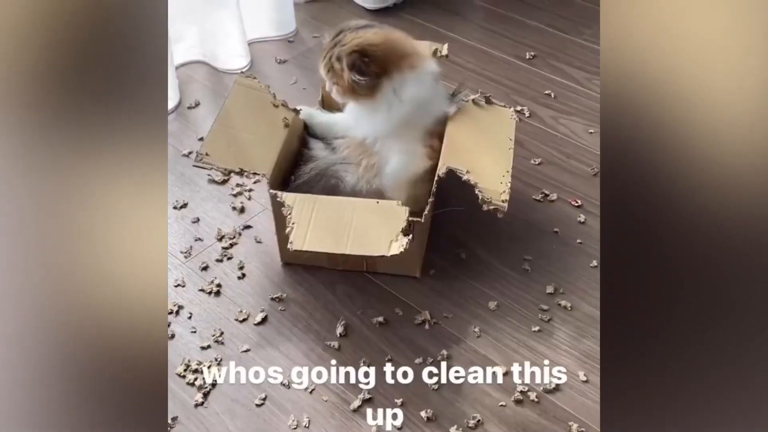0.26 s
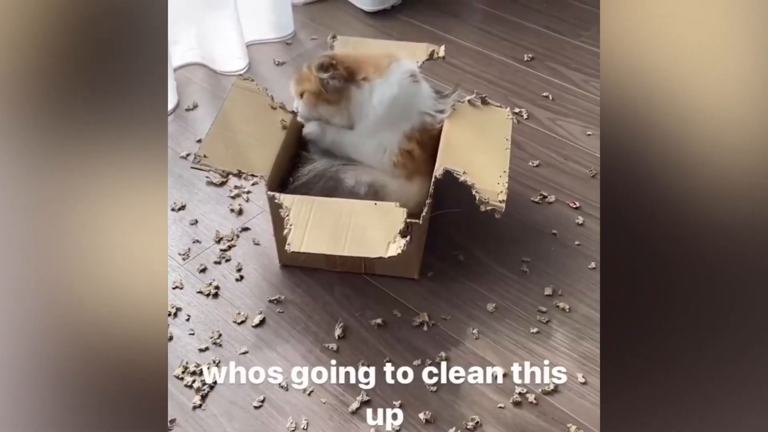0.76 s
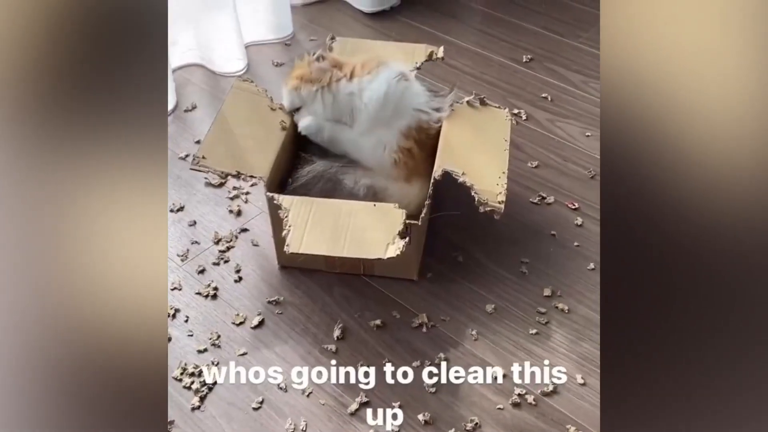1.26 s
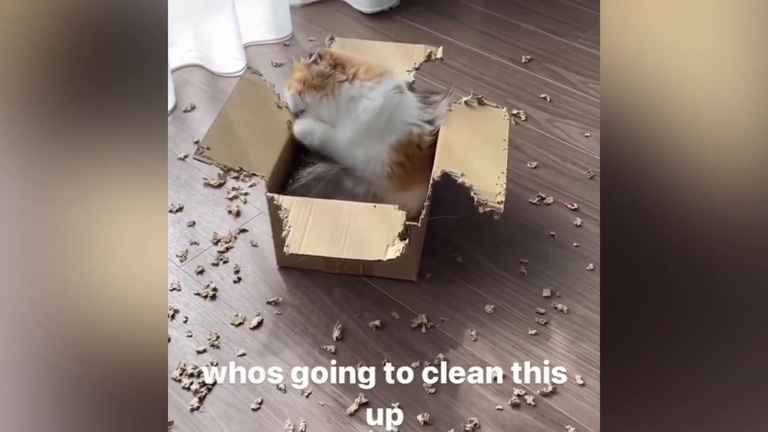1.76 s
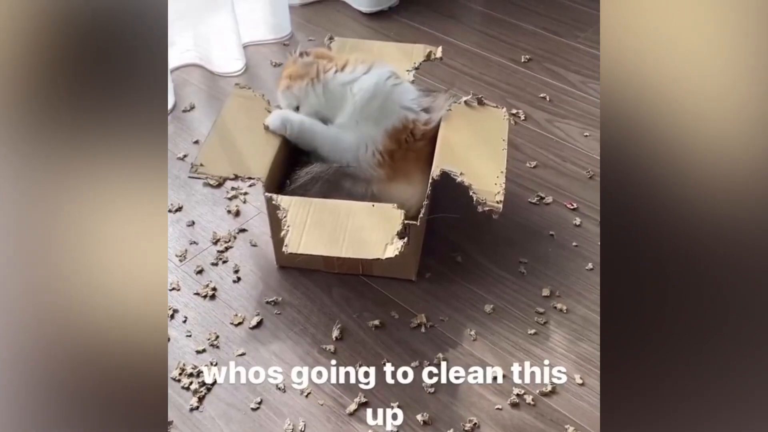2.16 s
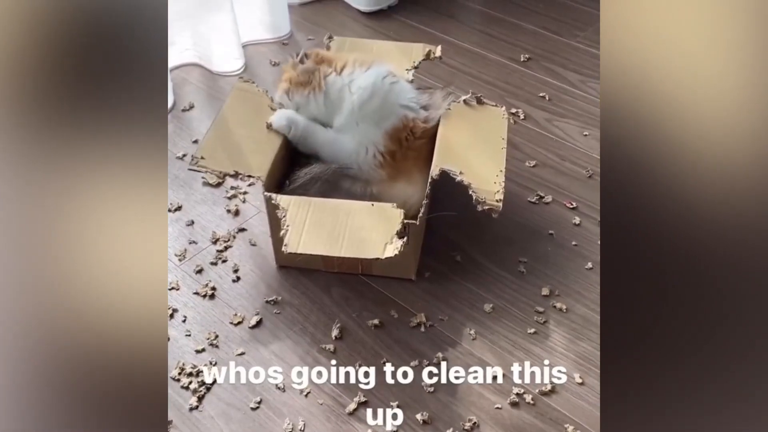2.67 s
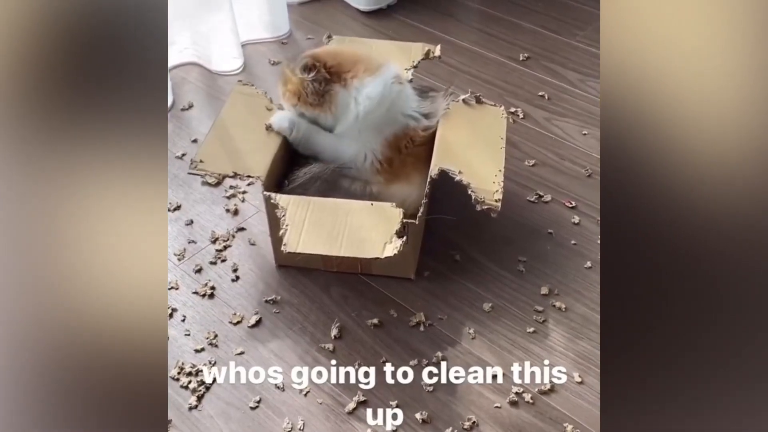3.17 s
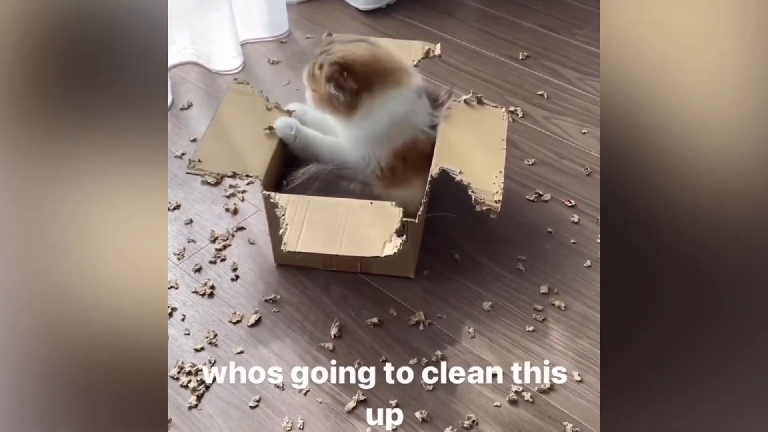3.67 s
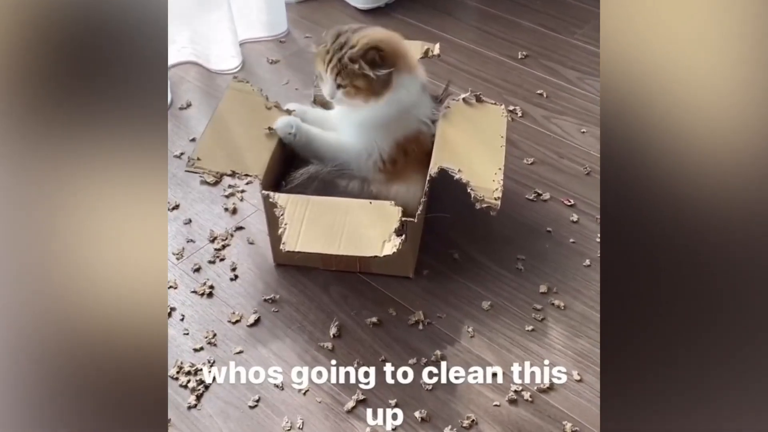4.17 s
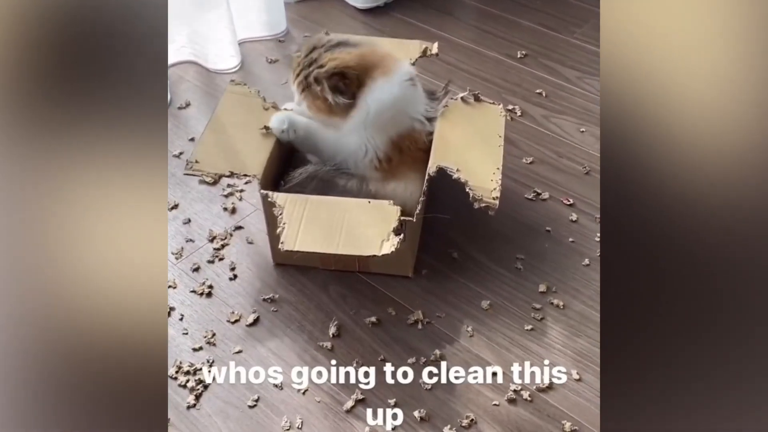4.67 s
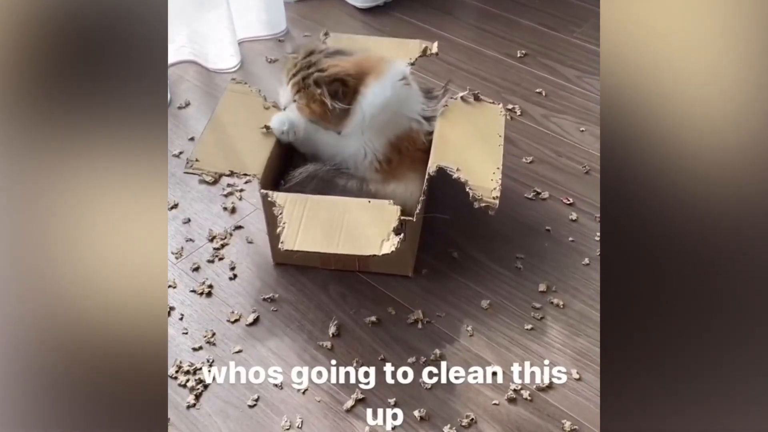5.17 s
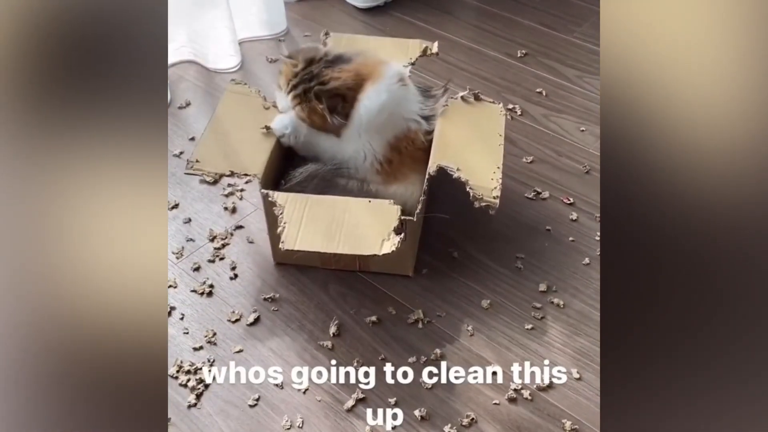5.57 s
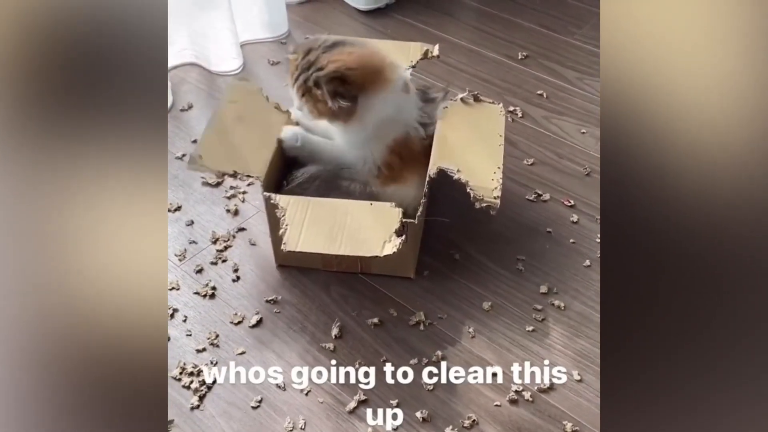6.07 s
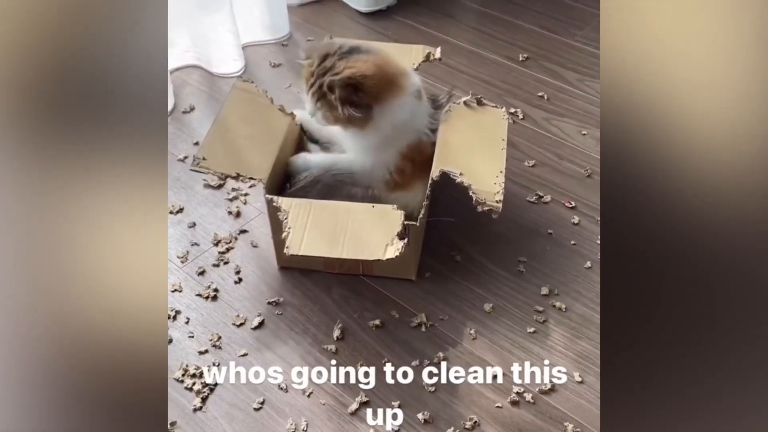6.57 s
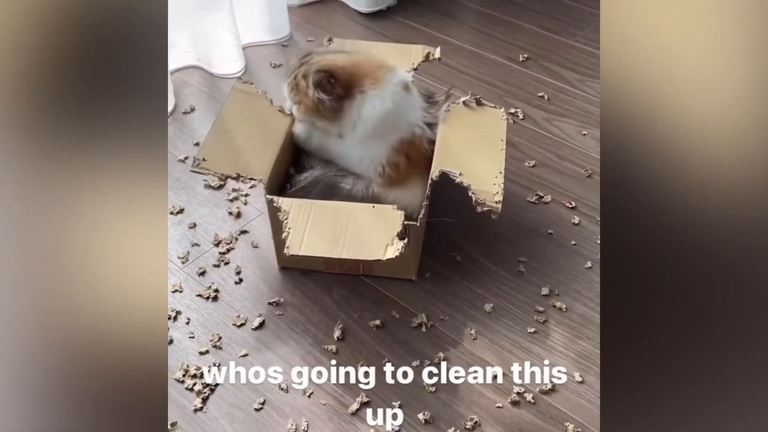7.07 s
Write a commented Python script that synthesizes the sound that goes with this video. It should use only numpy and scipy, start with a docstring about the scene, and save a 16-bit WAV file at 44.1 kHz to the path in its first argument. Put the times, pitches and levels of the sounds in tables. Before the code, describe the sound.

A cat bites and paws at a cardboard box on a wooden floor. Faint rubbing starts after a second, then hollow knocks and dry scrapes gather into a busy cluster before three seconds. A strong ripping thump follows, then sparse light scratches and near quiet, until the loudest tear and boxy thump around six seconds. Close stereo microphones in a small room, box slightly left, with short echoes and faint low hum.

```python
"""Scraping, squeaks, knocks and thumps: a cat in a cardboard box bites and tugs at a flap; paws and fur rub
the walls and the box knocks on a wooden floor. Clicks ring the card, filtered noise makes hiss and squeaks,
and sagging sines make thumps. The small room adds echoes and hums: dull airy noise, a low rumble that
swells, and two thin appliance tones. Two spaced microphones hear it."""
import sys
import numpy as np
from scipy import signal
from scipy.fft import rfft, irfft, next_fast_len
from scipy.io import wavfile

SR = 44100
rng = np.random.default_rng(int(sys.argv[2]) if len(sys.argv) > 2 else 0)


def log_audio(samples):
    """Write samples as a 16-bit WAV file to the path given in sys.argv[1]."""
    # one column per channel
    frames = np.atleast_2d(samples).T
    # limit to full scale, then quantise
    limited = np.clip(frames, -1, 1)
    pcm = np.round(limited * 32767).astype(np.int16)
    wavfile.write(sys.argv[1], SR, pcm)


N = 322812   # length in samples


def from_db(db):
    """Turn a level in dB into a gain."""
    return 10 ** (np.asarray(db) / 20)


def rms_one(x):
    """Scale a sound to rms 1."""
    return x / np.sqrt(np.mean(x ** 2) + 1e-20)


def in_time(rows):
    """Draw straight lines through (time, value) points, one value a sample."""
    s, values = np.transpose(rows)
    return np.interp(np.arange(N) / SR, s, values)


def at_hz(points, hz):
    """Read a (frequency, value) table along a log frequency axis."""
    table_hz, values = np.transpose(points)
    return np.interp(np.log(hz + 1), np.log(table_hz), values)


def coloured(x, spectrum):
    """Filter a sound by a (frequency, level) table."""
    size = next_fast_len(N)
    gain = from_db(at_hz(spectrum, np.fft.rfftfreq(size, 1 / SR)))
    return irfft(rfft(x, size) * gain, size)[..., :N]


def slow_noise(shape, cutoff_hz, fs=SR):
    """Random wandering: white noise with only its slow part kept."""
    lowpass = signal.butter(2, cutoff_hz, fs=fs, output="sos")
    return signal.sosfilt(lowpass, rng.standard_normal(shape))


def ring(clicks, hz, t60):
    """A resonator: a unit click starts a sine that falls 60 dB in t60 seconds."""
    r = from_db(-60 / (max(t60, 1e-3) * SR))
    w = 2 * np.pi * hz / SR
    return signal.lfilter([0, np.sin(w)], [1, -2 * r * np.cos(w), r * r], clicks + 1e-18)


def grains(per_s, spread_db):
    """Random clicks of uneven size and either sign, rms 1."""
    sizes = from_db(spread_db * np.minimum(rng.exponential(1, N), 4)) * rng.choice([-1, 1], N)
    return rms_one(sizes * (rng.random(N) < per_s / SR))


def hum():
    """Airy noise, a low resonance driven by noise, and sine tones that waver a little."""
    # room noise common to both sides, relative spectrum: [f/Hz, level/dB]
    mid_spectrum = [(12, -71), (20, -41.5), (49, -4), (68, 0.5), (112, -6), (148, -2.5), (219, -14),
                    (306, -2), (465, -16.5), (506, -13.5), (687, -21), (789, -20), (1200, -40.5),
                    (8650, -58), (11500, -59), (12500, -70), (15500, -73)]
    # its left-right difference, relative spectrum: [f/Hz, level/dB]
    side_spectrum = [(25, -21), (59, -25.5), (100, -21), (403, -8), (497, -7.5), (530, -7), (727, -19.5),
                     (792, -16), (843, -15.5), (1230, -25), (1620, -32.5), (11500, -52.5), (12500, -70),
                     (15500, -57)]
    # swelling of the low rumble: [t/s, level/dB]
    rumble_level = [(0, -60.5), (1.3, -67.5), (2.5, -61), (2.95, -65.5), (3.97, -52), (4.4, -62),
                    (5.1, -61.5), (6.24, -61), (7.32, -66.5)]
    # appliance tones, levels before the waver: [f/Hz, left level/dB, right level/dB, left leads/rad]
    tones = [(500, -65.5, -78, 2.46), (773, -65.5, -68.5, 2.15)]
    waver_db, wavers_hz = 2.5, 6
    mid = from_db(-55) * rms_one(coloured(rng.standard_normal(N), mid_spectrum))
    side = from_db(-65.5) * rms_one(coloured(rng.standard_normal(N), side_spectrum))
    rumble = rms_one(ring(rng.standard_normal(N), hz=57.2, t60=0.4))
    out = mid + from_db(in_time(rumble_level)) * rumble + side * [[1], [-1]]
    for hz, left_db, right_db, lead in tones:
        turn = 2 * np.pi * hz * np.arange(N) / SR
        waver = from_db(waver_db * rms_one(slow_noise(N, wavers_hz)))
        sides = from_db([[left_db], [right_db]])
        out += np.sqrt(2) * waver * sides * np.sin(turn + [[lead], [0]])
    return out


def stroke(s, hold, level_db, rise, fall):
    """Power of events that rise, hold and fall at set dB per second; where they overlap, powers add."""
    power, t = np.zeros(N), np.arange(N) / SR
    for at, held, db in np.broadcast(s, hold, level_db):
        # work only where the event is within 60 dB of full
        near = slice(max(int((at - 60 / rise) * SR), 0), int((at + held + 60 / fall) * SR))
        before = rise * (at - t[near])
        after = fall * (t[near] - at - held)
        power[near] += from_db(db - np.maximum(0, np.maximum(before, after))) ** 2
    return power


def rubbing():
    """Each catch of a claw or tooth rings one small patch of card for a few cycles; fibres and fur hiss."""
    # paws, teeth and fur drag over the card; t is when a stroke is full, sizzle is relative to hiss:
    # [t/s, held/s, scrape level/dB, hiss level/dB, finest sizzle level/dB]
    strokes = [(1.07, 0.072, -82, -82, -8), (1.2, 0.11, -72.5, -89, -7), (1.33, 0.044, -69.5, -88, -4),
               (1.57, 0.041, -73, -69, -5.5), (1.93, 0.13, -71.5, -74, -5.5), (2.05, 0.11, -73, -79, -4),
               (2.2, 0.14, -73.5, -75, -6.5), (2.43, 0.013, -65.5, -87, -7), (2.585, 0.007, -65, -71.5, -4),
               (2.653, 0.057, -62.5, -67, -4.5), (2.74, 0.041, -82, -69.5, 2.5),
               (2.82, 0.019, -75, -60.5, -5.5), (2.88, 0.016, -64, -64.5, -4), (3.061, 0.055, -79, -81, -8),
               (3.44, 0.053, -55.5, -63, -6.5), (3.62, 0.035, -75, -67.5, -7.5),
               (3.722, 0.011, -62.5, -67, -4.5), (3.918, 0.0059, -59.5, -74.5, -7),
               (4.02, 0.025, -65, -87, -1), (4.4, 0.064, -73, -105, -10), (4.61, 0.027, -73, -105, -12),
               (5.04, 0.01, -71, -102, -10), (5.455, 0.035, -63.5, -77, -7.5), (5.65, 0.024, -71, -82, -13),
               (5.82, 0.1, -67, -86, -11), (6.03, 0.12, -71, -81.5, -4), (6.18, 0.012, -46.5, -63.5, -6),
               (6.225, 0.043, -58.5, -66, -8), (6.295, 0.018, -75, -69, -11), (6.435, 0.024, -85, -94, -8)]
    # the card rips all at once: [t/s, scrape level/dB, hiss level/dB]
    rips = [(1.62, -50.5, -83), (2.716, -50, -48), (2.839, -68, -64), (3.425, -33, -42.5),
            (6.174, -34, -47)]
    # fur brushes the walls throughout: [t/s, level/dB]
    shifting = [(0.7, -88), (1.2, -82.5), (2.9, -72.5), (3.3, -82.5), (3.6, -73.5), (4.2, -80),
                (5.3, -81.5), (6.3, -72.5), (6.8, -81), (7.3, -83.5)]
    # relative spectrum of the scrape: [f/Hz, level/dB]
    scrape_spectrum = [(500, -3), (850, -4.5), (1150, -5.5), (1600, -6), (2200, -7), (3000, -17.5),
                       (4500, -19), (7000, -14.5), (12000, -59)]
    # relative spectrum of the hiss: [f/Hz, level/dB]
    hiss_spectrum = [(1800, 2), (3000, -0.5), (6000, -3), (8500, -3.5), (12000, -69)]
    stroke_rise, scrape_fall, hiss_fall = 442, 171, 242   # dB per s; the hiss stops sooner than the scrape
    rip_rise, rip_fall = 2500, 1800   # dB per s
    rip_sizzle_db = -7.5   # against the hiss of the rip
    patchy_db, patches_per_s = 4.5, 12.6   # each patch is caught now more, now less
    clumps_db, clumps_per_s = 1, 83   # strokes come in clumps
    snaps_db = -0.5   # single fibres snapping, against the catches
    step = 64   # samples for which a patch keeps its favour

    catches = grains(per_s=2000., spread_db=1.5)
    patches_hz = np.geomspace(700, 6500, 28)
    dealt = rng.integers(0, 28, N)   # the patch that each sample's catch would hit
    favour = rms_one(slow_noise((28, N // step + 1), patches_per_s, fs=SR / step))
    catches = catches * from_db(patchy_db * favour[dealt, np.arange(N) // step])
    rings = sum(ring(catches * (dealt == k), hz, 16 / hz) for k, hz in enumerate(patches_hz))

    snaps = grains(per_s=300., spread_db=3.0)
    # each snap rings four patches at once, more briefly
    snapping = sum(ring(snaps * (dealt % 7 == k % 7), hz, 6 / hz) for k, hz in enumerate(patches_hz))
    rings = rms_one(rings) + from_db(snaps_db) * rms_one(snapping)

    fibres = grains(per_s=12000., spread_db=1.8)
    sizzle = signal.sosfilt(signal.butter(4, 9300, "high", fs=SR, output="sos"), fibres)

    s, hold, scrape_db, hiss_db, fine_db = np.transpose(strokes)
    rip_s, rip_scrape_db, rip_hiss_db = np.transpose(rips)
    clumps = from_db(clumps_db * rms_one(slow_noise(N, clumps_per_s)))

    def effort(stroke_db, rip_db, fall=hiss_fall):
        """Power of strokes and rips together."""
        stroke_power = stroke(s, hold, stroke_db, stroke_rise, fall) * clumps ** 2
        return stroke_power + stroke(rip_s, 0, rip_db, rip_rise, rip_fall)

    scrape_power = effort(scrape_db, rip_scrape_db, scrape_fall) + from_db(in_time(shifting)) ** 2
    hiss_power = effort(hiss_db, rip_hiss_db)
    sizzle_power = effort(hiss_db + fine_db, rip_hiss_db + rip_sizzle_db)
    return (np.sqrt(scrape_power) * rms_one(coloured(rings, scrape_spectrum))
            + np.sqrt(hiss_power) * rms_one(coloured(fibres, hiss_spectrum))
            + np.sqrt(sizzle_power) * rms_one(sizzle))


def squeaks():
    """A claw or tooth sticks and slips on the card: a gliding band of friction noise in a rounded stroke."""
    # squeaks (narrow) and rasps (wide), level before the rounding, pitch at the start:
    # [t/s, length/s, level/dB, f/Hz, width/Hz]
    squeak_rows = [(0.911, 0.063, -81, 1960, 350), (1.066, 0.027, -84, 5600, 500),
                   (1.295, 0.058, -77, 2265, 1200), (1.363, 0.034, -75, 3720, 1500),
                   (1.568, 0.041, -73, 2190, 1000), (1.98, 0.063, -71, 1750, 400),
                   (2.143, 0.065, -76, 1920, 400), (2.245, 0.045, -74.5, 2640, 400),
                   (2.575, 0.021, -73, 2740, 900), (2.9, 0.024, -72, 3370, 400),
                   (3.396, 0.026, -63, 2290, 350), (3.437, 0.07, -50, 960, 248),
                   (3.928, 0.03, -57, 930, 254), (4.015, 0.027, -66.5, 2464, 500),
                   (4.016, 0.021, -73, 4620, 350), (4.434, 0.067, -80.5, 2110, 350),
                   (4.603, 0.052, -83, 2360, 250), (5.021, 0.049, -78, 1390, 500),
                   (5.439, 0.15, -76, 2346, 590), (5.624, 0.06, -83, 4000, 1800),
                   (5.79, .11, -68.5, 2255, 1100), (5.814, 0.15, -78.5, 3760, 1800),
                   (5.878, 0.069, -72.5, 2704, 940), (6.159, 0.21, -69, 3820, 1500),
                   (6.265, 0.099, -63.5, 2620, 1300)]
    sag = .12   # share of the pitch lost as the claw slows
    out = np.zeros(N)
    for s, length, level_db, hz, width_hz in squeak_rows:
        n, at = int(length * SR), int(s * SR)
        # the filter runs in for 2000 samples that are dropped
        flutter = slow_noise((2, n + 2000), width_hz / 2)[:, -n:]
        turn = 2 * np.pi * np.cumsum(hz * np.linspace(1, 1 - sag, n)) / SR
        band = rms_one(flutter[0] * np.sin(turn) + flutter[1] * np.cos(turn))
        rounded = np.sin(np.pi * np.linspace(0, 1, n) ** .55)
        out[at:at + n] += from_db(level_db) * band * rounded
    return out


def knocks():
    """Soft card gives way in a short burst of contacts; each strikes every mode above 300 Hz with its own
    strength, while the lower modes get one late push."""
    # knocks and tugs; level is a base for all modes, low modes and crack are relative to it, hardness tilts
    # the other modes, f is the pitch favoured by the struck spot:
    # [t/s, level/dB, low modes/dB, crack/dB, hardness/dB per octave, f/Hz]
    knock_rows = [(1.298, -49.5, -16, -35, 0.5, 605), (1.376, -57, -7, -8, 7.5, 2210),
                  (1.62, -38, -18.5, -35, 1, 677), (1.707, -58, -22, -21, 4.5, 3040),
                  (1.918, -53.5, -7.5, -8, 1, 700), (1.969, -58, -18, -23, -9, 1500),
                  (1.986, -44.5, -5.5, -35, 0.5, 660), (2.428, -41, -9, -30, 0, 610),
                  (2.579, -45, -18, -17, 0, 2600), (2.659, -50, -2.5, -21, 2, 1100),
                  (2.7142, -37.5, -8, -9.5, 3.5, 2700), (2.737, -52.5, 2, -20, -16, 607),
                  (2.821, -41.5, -12, -9, 2, 1700), (2.828, -42, -12, -12, 5.5, 1450),
                  (2.88, -47.5, -3, -1, -9.5, 796), (2.894, -56, 4, 0, 6.5, 3000),
                  (3.412, -34, -29, -42, 4, 1150), (3.422, -29.5, -18.5, -21, 1.5, 2200),
                  (3.457, -45, -7.5, -29, 4, 850), (3.622, -51, -9, -15, -6, 2000),
                  (3.722, -43, -29, -6, 1, 1100), (3.893, -55, -21, -19, -5, 800),
                  (3.923, -50.5, -21, -36, -7, 810), (4.017, -44.5, -41, -19, -1, 1860),
                  (5.454, -50, -28, -33, 4.5, 790), (5.56, -57.5, -10, -13, 0, 605),
                  (6.003, -55.5, -29, -13, 4, 690), (6.154, -46.5, -30, -33, -15, 500),
                  (6.16, -30, -9.5, -14.5, 4.5, 4000), (6.165, -34, -37, -22, 8.5, 1210),
                  (6.176, -31, -10.5, -31, -3, 603), (6.195, -45, -1, -35, 6, 1890),
                  (6.433, -55, -28, -16, 5.5, 2010)]
    # modes of the box walls and the air inside, level relative, t60 before a cap: [f/Hz, level/dB, t60/s]
    modes = [(155.6, 12, 0.13), (231.4, 11, 0.17), (237, 9.5, 0.045), (320, -7, 0.046), (393, 2, 0.09),
             (436, 6.5, 0.028), (554, -1, 0.049), (624, -0.5, 0.034), (764, 2.5, 0.019), (850, -7, 0.089),
             (1110, -4, 0.018), (1164, -9.5, 0.11), (1250, -13.5, 0.037), (1458, -8.5, 0.033),
             (1750, -7, 0.018), (1940, -21.5, 0.043), (2060, -21.5, 0.025), (2714, -13.5, 0.015),
             (3160, -25, 0.014), (4000, -20.5, 0.0083), (4700, -18, 0.036), (5480, -25.5, 0.0085)]
    contact_s = 0.00567   # length of the burst of contacts
    late_s = 0.00531   # the big walls follow the contact a moment later
    spot_db, spot_octaves = 8.5, 0.21   # lift and width of the favoured modes
    s, base_db, weight_db, crack_db, hardness, spot_hz = np.transpose(knock_rows)
    # four contacts: the first on time, the others at random places in the burst
    slips = (np.arange(4) + rng.random((len(s), 4)) * [0, 1, 1, 1]) / 4
    at = ((s[:, None] + slips * contact_s) * SR).astype(int)
    signs = np.where(slips > 0, rng.choice([-1, 1], at.shape), 1)
    push = signs * from_db(-15 * np.sqrt(slips))   # later contacts are weaker
    out = np.zeros(N)
    for k, (hz, level_db, t60) in enumerate(modes):
        blow_db, clicks = base_db + level_db - 9.0, np.zeros(N)
        if hz < 300:   # slow modes feel the burst as one push
            uneven_db = rng.normal(0, 2.2, len(s))
            clicks[at[:, 0] + int(late_s * SR)] = from_db(blow_db + weight_db + 3 + uneven_db)
        else:
            blow_db = blow_db + hardness * np.log2(hz / 800)
            blow_db = blow_db + spot_db * np.exp(-(np.log2(hz / spot_hz) / spot_octaves) ** 2)
            uneven_db = rng.normal(0, 1.44, at.shape)
            np.add.at(clicks, at, push * from_db(blow_db[:, None] + uneven_db))
        # damped card: t60 lasts 40 cycles at most; every other mode is flipped
        out += (-1) ** k * ring(clicks, hz, min(t60, 40 / hz))
    # fibres snapping: bright noise that dies in a few ms
    snap = np.zeros(N)
    snap[at[:, 0]] = from_db(base_db + crack_db)
    snap = signal.lfilter([1], [1, -np.exp(-1 / (0.0038 * SR))], snap)
    bright = signal.butter(4, [2000, 9000], "band", fs=SR, output="sos")
    return out + signal.sosfilt(bright, snap * rng.standard_normal(N))


def thumps():
    """A wall caves in with a few cycles that swell, sag in pitch and die."""
    # [t/s, peak level of the swell/dB, first f/Hz, time to fall an octave/s]
    thump_rows = [(1.6195, -51, 770, 0.03), (1.623, -46, 350, 0.025), (1.627, -38.5, 268, 0.11),
                  (2.43, -43, 265, 0.025), (2.7155, -35.5, 587, 0.038), (2.718, -37.5, 294, 0.026),
                  (2.828, -43.5, 600, 0.047), (2.839, -36.5, 232, 0.03), (2.888, -35, 197, 0.013),
                  (3.421, -28.5, 795, 0.05), (3.422, -30.5, 283, 0.014), (3.426, -28.5, 430, 0.063),
                  (3.935, -53, 694, 0.022), (5.454, -57, 800, 0.03), (6.158, -28.5, 530, 0.016),
                  (6.165, -23.5, 284, 0.017), (6.175, -29, 890, 0.017), (6.179, -32, 538, 0.02),
                  (6.199, -42, 110, 0.059), (6.249, -45, 135, 0.083)]
    swell_cycles = 1.19   # cycles of the first pitch until a thump is loudest
    out, t = np.zeros(N), np.arange(SR // 8) / SR
    for s, level_db, hz, octave_s in thump_rows:
        cycles = hz * octave_s / np.log(2) * (1 - 2 ** (-t / octave_s))
        grown = t * hz / swell_cycles
        swell = grown * np.exp(1 - grown)   # reaches 1 at its peak
        out[int(s * SR):][:len(t)] += from_db(level_db) * swell * np.sin(2 * np.pi * cycles)
    return out


def booms():
    """The box rocks on the floor: the heavy boards swing up slowly and ring low."""
    # level before the slow rise lowers it: [t/s, level/dB]
    boom_rows = [(1.631, -45.5), (2.919, -45), (3.438, -36.5), (6.175, -37)]
    # ringing of the floor: [f/Hz, t60/s, rise/s]
    floorboard = (64, .45, .012)
    hz, t60, rise = floorboard
    t, out = np.arange(N) / SR, np.zeros(N)
    for s, level_db in boom_rows:
        after = np.clip(t - s, 0, None)
        fade = from_db(level_db - 60 * after / t60)
        out += fade * (1 - np.exp(-after / rise)) * np.sin(2 * np.pi * hz * after)
    return out


def ports(x):
    """The near sound at the two microphone ports: unequal in level and phase."""
    # box louder on the left, values below 0 count as 0: [f/Hz, level/dB]
    lean = [(200, -2), (400, 3.5), (1300, 10), (2400, 3), (5000, -9)]
    # phase between the ports: [f/Hz, left leads/rad]
    left_leads = [(150, 0.063), (400, 0.16), (1400, 1.03), (2200, 6.85), (5500, 7.22), (8300, 9.17),
                  (15000, 5.05)]
    size = next_fast_len(N)
    hz = np.fft.rfftfreq(size, 1 / SR)
    # half of the difference goes to each side
    half = from_db(np.clip(at_hz(lean, hz), 0, None) / 2) * np.exp(.5j * at_hz(left_leads, hz))
    return irfft(rfft(x, size) * np.array([half, 1 / half]), size)[:, :N]


def room(x):
    """Dense echoes above the bass that die by octave band; long waves reach both microphones alike."""
    # time for the echoes to fall 60 dB: [f/Hz, t60/s]
    room_t60 = [(350, 0.36), (1000, 0.26), (4000, 0.27), (12000, 0.19)]
    t = np.arange(SR // 2) / SR
    tails = np.zeros((2, len(t)))
    for low in 250 * 2. ** np.arange(7):
        band = signal.butter(2, [low, min(2 * low, SR * .49)], "band", fs=SR, output="sos")
        fade = from_db(-60 * t / at_hz(room_t60, low * np.sqrt(2)))
        tails += signal.sosfilt(band, rng.standard_normal(tails.shape)) * fade
    # the echoes fade in over 2.1 ms
    tails *= np.clip(t / 0.0021, 0, 1) / np.sqrt(np.sum(tails[0] ** 2))
    # the left-right difference loses its low part
    tails[1] = signal.sosfilt(signal.butter(4, 444, "high", fs=SR, output="sos"), tails[1])
    mid, side = signal.fftconvolve(x[None], tails, axes=1)[:, :N]
    return np.array([mid + side, mid - side])


def scene():
    """The box is heard directly and through the room; thumps, floor booms and hum add no echoes."""
    box = knocks() + rubbing() + squeaks()
    room_db = -5
    return ports(box + thumps()) + from_db(room_db) * room(box) + booms() + hum()


def record(dry):
    """The top is cut steeply near 15.8 kHz."""
    return signal.sosfilt(signal.cheby2(20, 70, 15800, fs=SR, output="sos"), dry)


dry = scene()
out = record(dry)
log_audio(out)
```